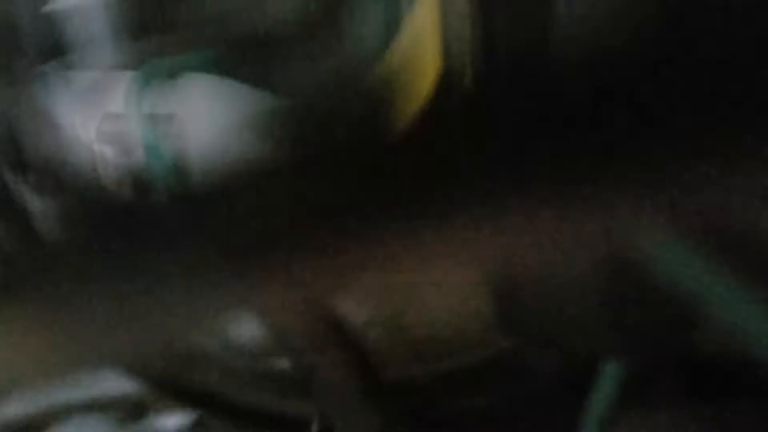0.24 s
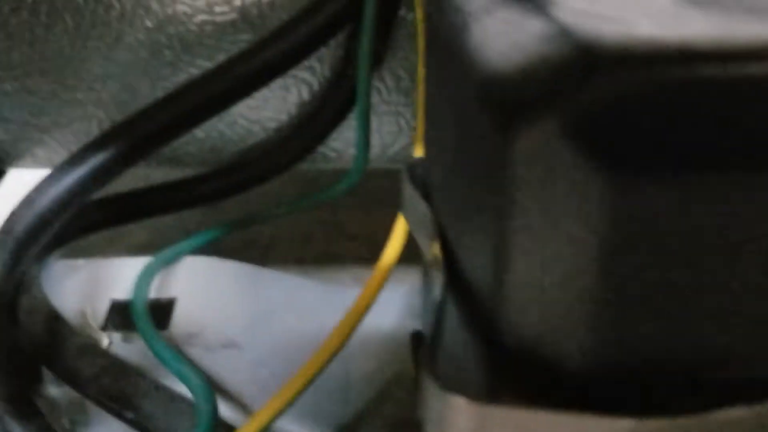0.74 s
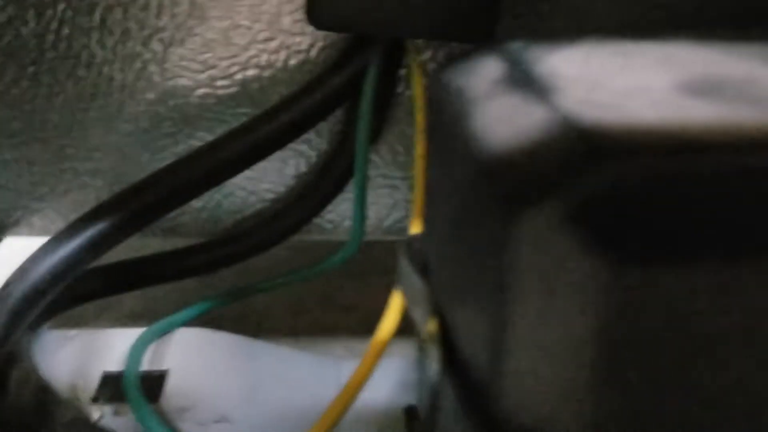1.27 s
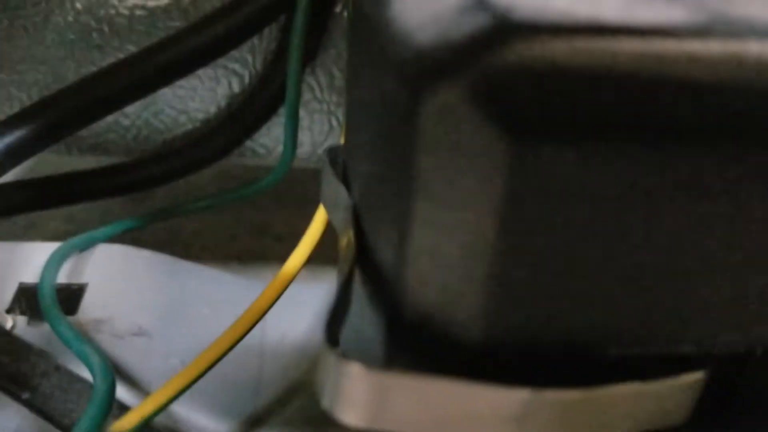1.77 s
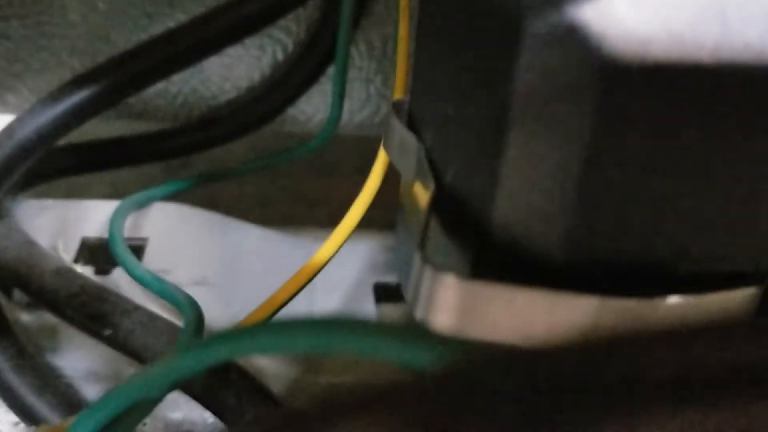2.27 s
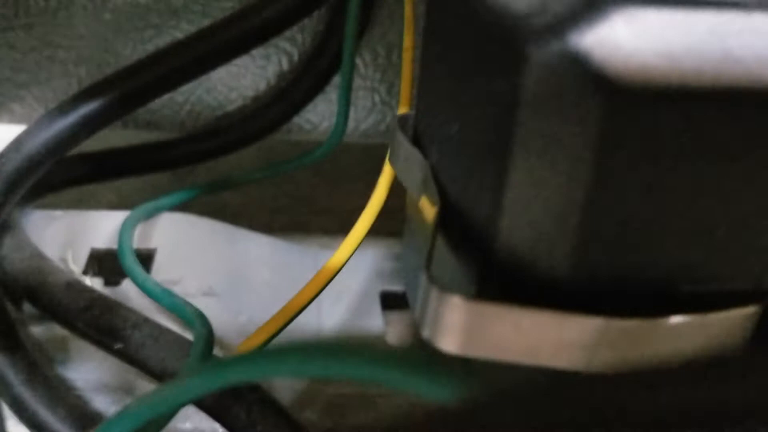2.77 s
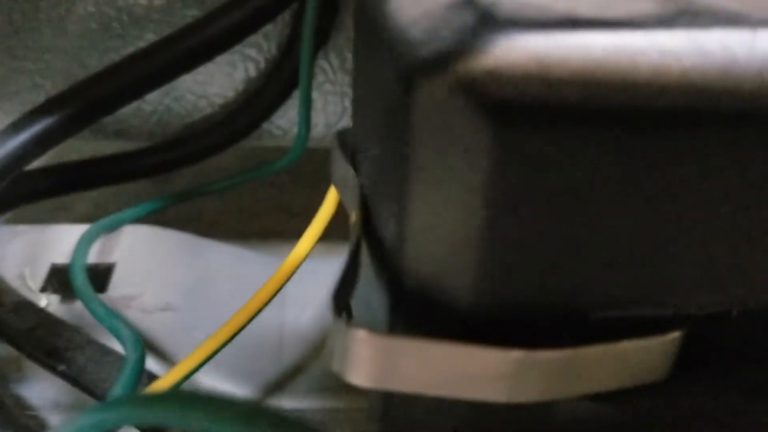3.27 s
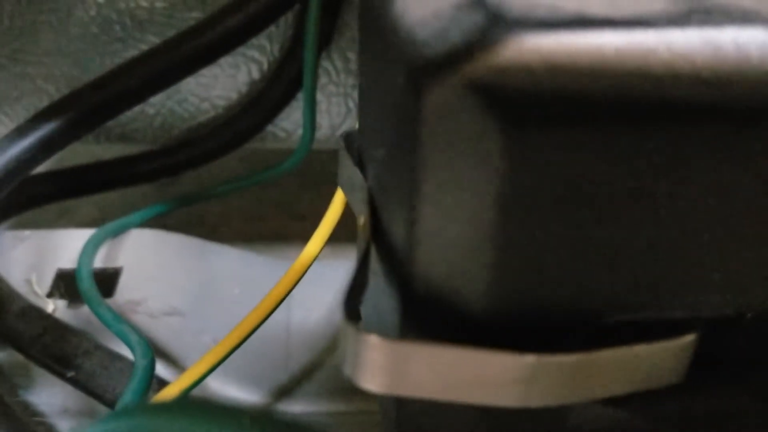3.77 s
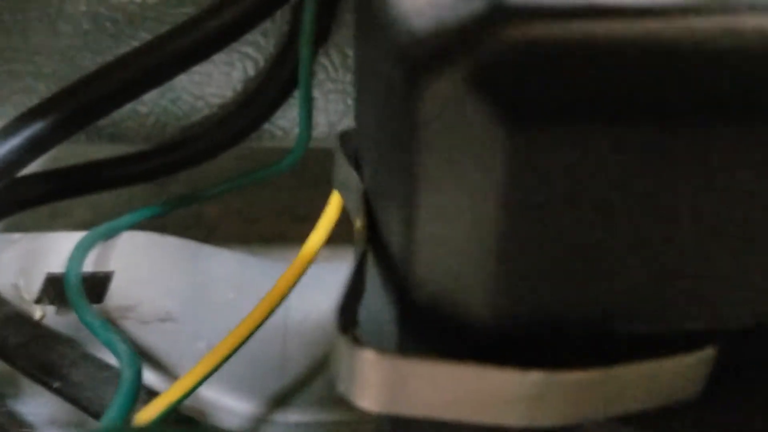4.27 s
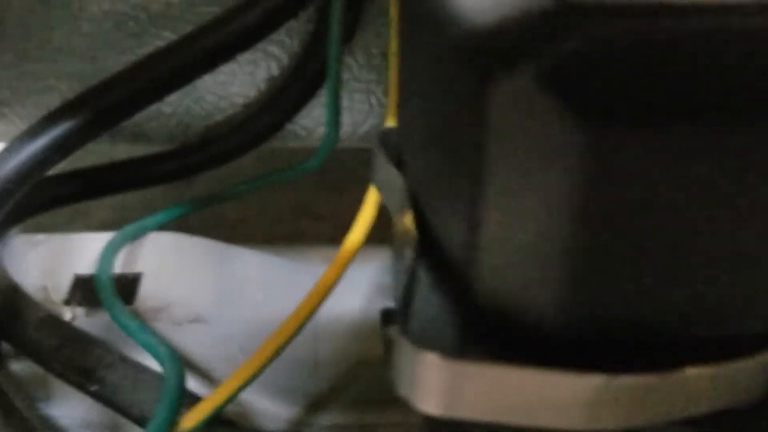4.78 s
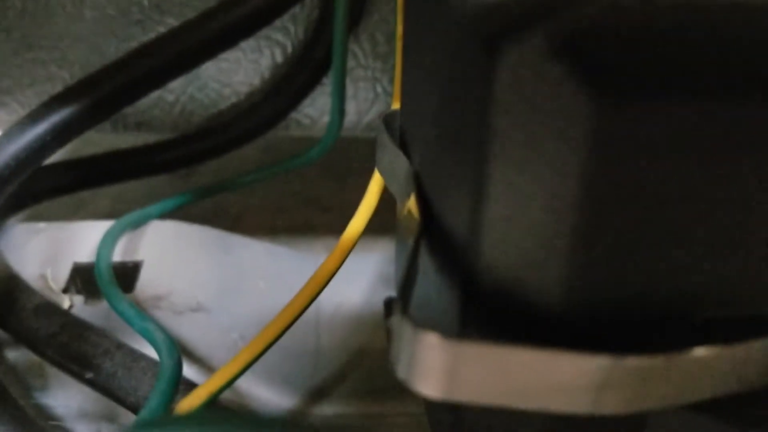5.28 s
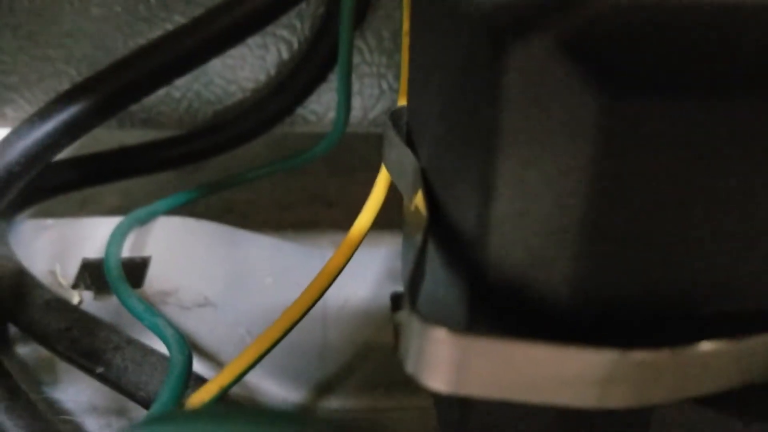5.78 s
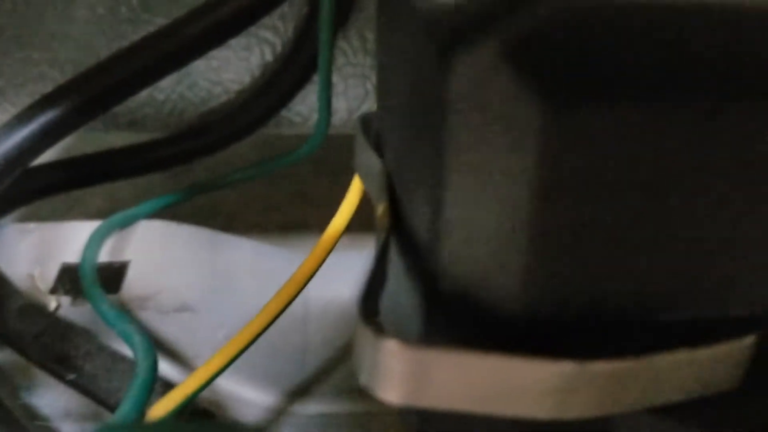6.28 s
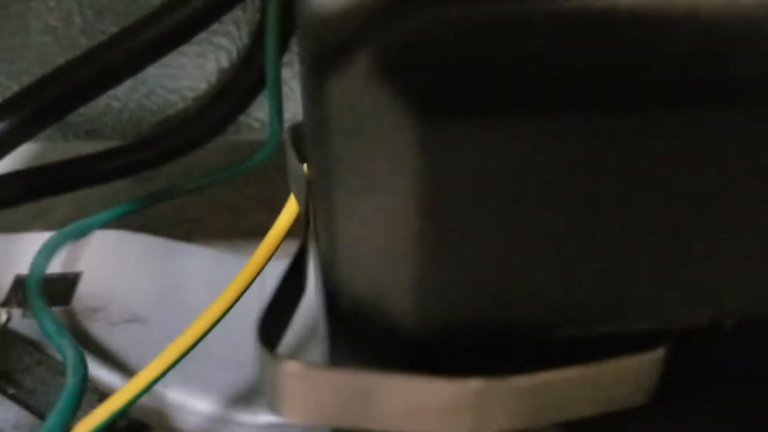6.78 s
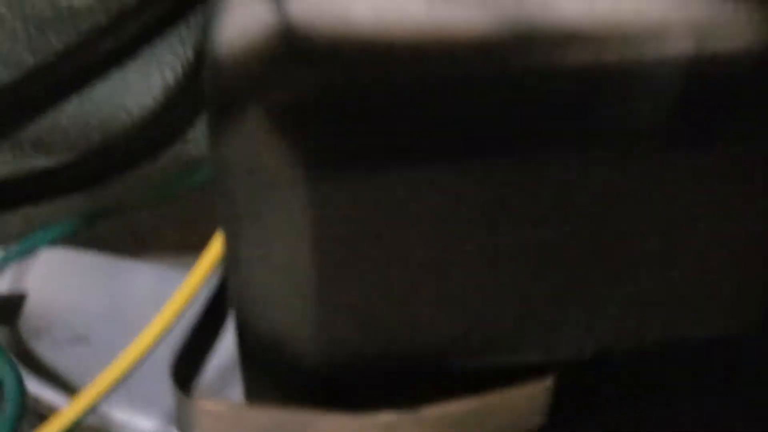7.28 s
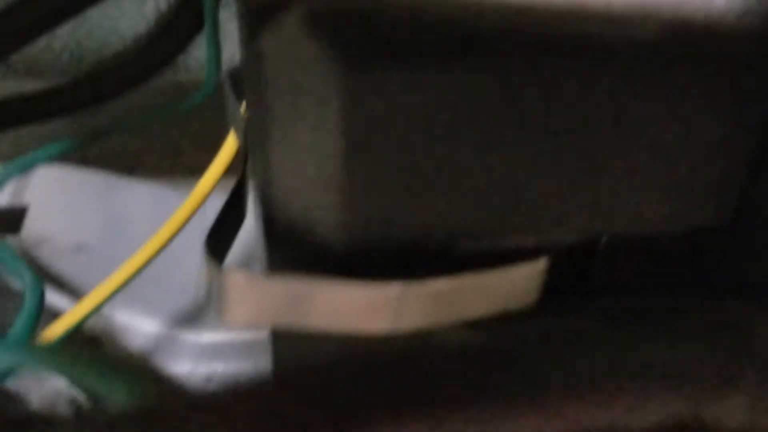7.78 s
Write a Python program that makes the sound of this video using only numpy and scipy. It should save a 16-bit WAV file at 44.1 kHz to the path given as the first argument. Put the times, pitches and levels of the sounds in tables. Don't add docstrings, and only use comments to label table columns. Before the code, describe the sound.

Indoors, microphones lie beside a fridge compressor. The case bumps a pipe, then rubs faintly as a car pulls away outside. Low hum begins, and a bright, dry relay snap cracks out, nearer the left. A heavy truck passes with droning, wavering engine tones that slide downward, tyre roar and thin whines. A quieter relay click stops the hum; traffic murmurs on with a faint distant idle.

```python
import sys
import numpy as np
from scipy import signal
from scipy.fft import rfft, irfft
from scipy.io import wavfile

SR = 44100
rng = np.random.default_rng(int(sys.argv[2]) if len(sys.argv) > 2 else 0)


def gain_from_db(level_db):
    decades = np.asarray(level_db, float) / 20
    return 10 ** decades


def unload_wav(signal):
    wavfile.write(
        sys.argv[1],
        SR,
        np.round(np.clip(np.atleast_2d(signal).T, -1, 1) * 32767).astype(np.int16),
    )


N = 354784

# time in seconds, cycle rate in Hz, level in dB.
ENGINE = [(1.4, 42.2, -51.5), (1.75, 43.88, -51), (2.35, 43.51, -50), (2.72, 43.72, -41),
          (2.95, 43.13, -39), (3.5, 41.25, -39.5), (3.87, 38.08, -33), (4.11, 35.69, -39.5),
          (4.3, 34.18, -42.5), (5.4, 34.25, -41), (6.0, 33.08, -43), (6.56, 32.0, -46), (6.8, 31.53, -41),
          (7.0, 30.74, -47), (7.4, 32.15, -53.5)]
# time in seconds, left over right in dB.
ENGINE_LEAN = [(1.4, -1.5), (4.01, 1), (4.64, -7.5), (5.12, -1.5), (6.26, -3), (6.9, -3), (7.4, 4)]
# multiple of the cycle rate, level in dB.
LOW_ORDERS = [(2, 1), (3, -3), (4, 0.8)]
UPPER_ORDERS = [(1, -4.5), (5, -2.5), (6, 3), (7, -2), (8, -0.5), (9, -5), (10, -7), (11, -8.5), (12, -11)]
# centre in Hz, width in Hz, peak in dB.
LOW_RESONANCES = [(91.7, 6.2, 3), (132.1, 9.3, 11.5), (164.6, 10, 3.5)]
UPPER_RESONANCES = [(160, 17, -14.5), (213, 6.8, -13), (263.4, 14, -0.5), (295.2, 18, -2.5),
                    (338, 17, -11.5), (356, 11, -8)]
ECHO_LULLS = {2: [(1.8, 0.22, 7.5), (2.1, 0.071, -5), (2.4, .15, 4), (3.05, 0.13, 1), (3.78, 0.063, 6),
              (4.1, .12, -8)], 3: [(1.75, .15, -15), (2.15, 0.27, -8), (3.45, 0.22, -14.5),
              (3.71, 0.031, 5), (3.95, 0.16, -13)], 4: [(3.62, 0.041, -4.5), (4.11, 0.067, -3),
              (4.36, 0.11, 3), (4.58, .11, -15.5), (6.75, .1, 3), (5.28, 0.083, -4.5), (6.55, 0.046, -10),
              (7.15, 0.043, -8)], 6: [(1.85, .2, 5.5), (2.75, 0.033, 6), (3.35, .15, 3)],
              7: [(2.85, 0.116, 7.5), (3.95, .1, 3)], 9: [(3.05, 0.17, 7), (3.75, .1, 3)],
              11: [(2.7, .15, -7)], 8: [(4.2, 0.13, -6), (4.9, .2, -9), (5.4, 0.23, 2.5), (6.3, .2, -3.5)]}
# time in seconds, tilt in dB per order.
PATH_TILT = [(1.4, 2.5), (2.4, -2.5), (2.8, -2.5), (3.5, 1.05), (4.1, 0.33), (4.6, 2), (5.5, 0),
             (6.5, -0.4), (7.4, 1)]


def truck():
    rate_hz, level_db = in_time(ENGINE)
    low = []
    for order, order_db in LOW_ORDERS:
        hz = order * rate_hz
        db = level_db + order_db + bumps(ECHO_LULLS[order])
        leak = gain_from_db(2 * -11.5)
        low.append(booming(hz, LOW_RESONANCES, leak) * tone(hz, db, rough_db=1.28, lead=0.34))
    second, third, fourth = low
    out = second + third + fourth * pan(in_time(ENGINE_LEAN)[0])
    tilt_db, = in_time(PATH_TILT)
    for order, order_db in UPPER_ORDERS:
        hz = order * rate_hz
        db = level_db + order_db + bumps(ECHO_LULLS.get(order, [])) + max(order - 6, 0) * tilt_db
        sound = tone(hz, db, rough_db=3.0, lead=rng.normal(0, 0.43))
        out += booming(hz, UPPER_RESONANCES, 0.0041) * sound
    return out * while_on(ENGINE, 0.35)


# pitch in Hz, level in dB.
SHELL_TONES = [(3957, -88), (4317, -95), (5760, -94.5)]


def compressor():
    start_s, end_s = 2.6, 5.87
    t = np.arange(N) / SR
    slot_hz = 478.4 - 9 * np.exp(-np.maximum(t - start_s, 0) / 0.33)
    waiting = np.clip((SNAPS[0][0] + .05 - t) / .05, 0, 1)
    slot = tone(slot_hz, -55 - 4.5 * waiting, rough_db=2.6)
    out = slot * pan(35.0)[:, None] * 0.34
    out += tone(np.full(N, 120.0), -39.5 - 4 * waiting, rough_db=2.5)
    out += sum(smeared(hz, db, width_hz=130) for hz, db in SHELL_TONES)
    return out * while_on([[start_s], [end_s]], 0.061)


# start in seconds, peak in dB, left over right in dB, rise in ms,
# bounce in dB, cabinet tail in dB.
SNAPS = [
    (3.1460, -19.5, 7.5, 1.7, -10, -30),
    (5.8318, -32.5, 3, 2.0, -9, -27),
]
# pitch in Hz, level in dB, decay setting in seconds; each mode dies away by 60 dB
# in half this time, held between 0.02 and 0.08 s.
CLOSING_MODES = [(2640, -15, 5.0), (4020, 7, 0.05), (7004, -13, 0.19), (8270, -2, 0.076), (7550, -11, 0.13),
                 (8240, -7.5, 0.15), (14400, -6, 0.13), (14580, -15, 0.23)]
OPENING_MODES = [(5868, -8.5, 0.053), (7639, -24.5, 1.9), (10090, -20, 5.0), (12220, -16, 0.049),
                 (12840, -4, 0.036), (15000, 3, 0.04)]
# frequency in Hz, density in dB per Hz.
CLOSING_SPECTRUM = [(1180, -57), (2000, -26), (3110, -9), (3430, -21), (3950, 1), (4710, -3), (4920, -12),
                    (8000, -8), (8890, -22), (10200, -13), (12700, -14), (13700, -9), (16100, -14.5),
                    (16500, -35.5)]
OPENING_SPECTRUM = [(1410, -44), (2400, -12), (3110, 1), (3510, -17), (4220, -30), (4540, -6),
                    (5000, -16.5), (5880, -10.5), (7920, -21.5), (8380, -8.5), (11600, -16), (15000, -6.5),
                    (16100, -6.5), (16500, -31)]


def relay():
    out, t = np.zeros((2, N)), np.arange(SR // 5) / SR
    bounce_s = .0042
    spectra, mode_sets = (CLOSING_SPECTRUM, OPENING_SPECTRUM), (CLOSING_MODES, OPENING_MODES)
    for row, spectrum, modes in zip(SNAPS, spectra, mode_sets):
        s, db, lean_db, rise_ms, bounce_db, tail_db = row
        white = rng.standard_normal((2, len(t)))
        bin_hz = np.arange(len(t) // 2 + 1) * SR / len(t) + 1
        grit = rms_one(irfft(rfft(white) * gain_from_db(at_hz(spectrum, bin_hz)), len(t)))
        rise = 1000 * t / rise_ms
        blow = (rise * np.exp(1 - rise)) ** 3.0
        chatter = blow + gain_from_db(bounce_db) * np.roll(blow, round(bounce_s * SR))
        body = 0
        for hz, mode_db, t60 in modes:
            ring_s = np.clip(.5 * t60, .02, .08)
            r, w = gain_from_db(-60 / (ring_s * SR)), 2 * np.pi * hz / SR
            mode = signal.lfilter([1, 0, -1], [1, -2 * r * np.cos(w), r * r], white * chatter)
            body = body + gain_from_db(mode_db) * mode
        tail = gain_from_db(tail_db) * np.exp(-t / 0.029) * np.minimum(rise, 1)
        snap = grit * (chatter + tail) / 3 + gain_from_db(-13.5) * body / np.abs(body).max()
        add_at(out, s, gain_from_db(db) * snap * pan(lean_db)[:, None])
    return out


# start in seconds, pitch in Hz, left height, right height.
CONTACTS = [
    (.16306, 1680, 0, -.66),
    (.16327, 1750, -.46, 0),
    (.16425, 1060, -1, .04),
    (.16455, 360, .47, -.12),
    (.1660, 1300, -.03, -.1),
    (.1670, 180, -.33, .33),
    (.1681, 390, -.36, .06),
    (.1712, 72, .27, 0),
    (.1761, 900, -.14, -.05),
    (.1769, 420, -.23, .02),
]
SLOW_RINGS = [
    (.1706, 61, 0, -.19),
    (.1633, 3700, .0008, .003),
]
# start in seconds, peak in dB, centre in Hz, left over right in dB.
CASE_TICKS = [
    (.1630, -22, 2800, -7),
    (.1682, -43, 11000, 6),
    (.2545, -50, 6500, 6),
    (.3381, -49, 8500, 8),
    (.3703, -51, 8000, 2),
    (.7994, -45, 5000, 6),
    (4.9117, -58, 4800, 3),
    (6.3964, -55, 9000, 4),
]
# centre in seconds, length in seconds, level in dB, pitch in Hz.
CABLE_RUBS = [
    (.171, .008, -58, 5500),
    (0.212, .05, -69, 3300),
    (0.344, 0.11, -77, 6070),
    (.52, 0.046, -73, 3500),
    (0.655, 0.16, -80, 4600),
    (0.793, 0.05, -74, 4056),
    (3.409, .07, -53.5, 2480),
    (3.399, 0.05, -63.5, 5500),
    (3.492, 0.075, -59.5, 2400),
    (5.866, .04, -71, 3100),
]


def handling():
    out, t = np.zeros((2, N)), np.arange(SR // 8) / SR

    def strike(s, hz, left, right, rise_ms):
        rise = 1000 * t / rise_ms
        swing = np.sin(2 * np.pi * hz * t) * rise * np.exp(1 - rise)
        add_at(out, s, swing * [[left], [right]])

    for s, hz, left, right in CONTACTS:
        strike(s, hz, left, right, rise_ms=.16 + 1000 * .21 / hz)
    for s, hz, left, right in SLOW_RINGS:
        strike(s, hz, left, right, rise_ms=7.5)
    for s, db, hz, lean_db in CASE_TICKS:
        burst = rng.standard_normal((2, len(t))) * (np.exp(-t / .0004) + .06 * np.exp(-t / .004))
        burst = bandpass(burst, 1, hz / 2, min(hz * 2.5, .45 * SR))
        add_at(out, s, gain_from_db(db) * burst / np.abs(burst).max() * pan(lean_db)[:, None])
    for s, length, db, hz in CABLE_RUBS:
        span = np.arange(round((s - length) * SR), min(N, round((s + length) * SR)))
        grit = bandpass(rng.standard_normal((2, SR // 2)), 2, hz / 1.6, hz * 1.22)
        stroke = np.exp(-(1.8 * (span / SR - s) / length) ** 2)
        out[:, span] += gain_from_db(db) * rms_one(grit[:, :len(span)]) * stroke
    return out


# centre in seconds, length in seconds, level in dB.
THROTTLE = [
    (0.332, 0.042, -43.5),
    (0.537, 0.056, -45.5),
    (0.824, 0.11, -40.5),
    (1.33, 0.25, -42.5),
]
# time in seconds, pitch in Hz, level in dB.
TURBO_WHINE = [(0.7, 10080, -100), (1.5, 10550, -96.5), (2.2, 10730, -93), (2.7, 10870, -86.5),
               (3.1, 10680, -84.5), (4.0, 10570, -94), (5.0, 10570, -91.5), (5.8, 10240, -92.5),
               (6.6, 10110, -94.5), (8.04, 10130, -97.5)]
GEAR_WHINES = [
    [(2.25, 6500, -86), (2.6, 6520, -91), (3.1, 6940, -85), (3.9, 7100, -95)],
    [(4.1, 7100, -89), (4.3, 6900, -85.5), (4.45, 6560, -82.5), (4.6, 6480, -87)],
]
BRAKE_SQUEAK = [(3.83, 8521, -107), (3.848, 8560, -104), (3.866, 8753, -92), (3.944, 9100, -78),
                (4.012, 9002, -78.5), (4.03, 9164, -105)]
FAR_IDLE = [(6.9, 294.4, -60.5), (7.2, 295.7, -56), (8.04, 296.8, -53.5)]


def whines():
    t = np.arange(N) / SR
    start_s, end_s = 0.1956, 1.6
    throttle = sum(gain_from_db(db) * np.exp(-((t - s) / length) ** 2) for s, length, db in THROTTLE)
    car_hz = 131.7 + 10.96 * (t - start_s)
    car = throttle * tone(car_hz, 0, rough_db=-0.5) * while_on([[start_s], [end_s]], .05)
    turbo = smeared(*in_time(TURBO_WHINE), width_hz=130) * while_on(TURBO_WHINE, .02)
    gear = sum(smeared(*in_time(strand), width_hz=220) * while_on(strand, .1) for strand in GEAR_WHINES)
    idle_hz, idle_db = in_time(FAR_IDLE)
    idle = tone(idle_hz, idle_db, rough_db=1.5) + tone(idle_hz * 5 / 3, idle_db - 11, rough_db=1.5)
    idle = idle * while_on(FAR_IDLE, .02)
    squeak = tone(*in_time(BRAKE_SQUEAK), rough_db=.7, lead=1.5) * while_on(BRAKE_SQUEAK, .008)
    return car + turbo + gear + idle + squeak


# frequency in Hz, density in dB per Hz.
ROAD_SPECTRUM = [(18, -50), (28, -33.5), (42, -12), (65, -2.5), (110, -6.5), (250, -8), (330, -17),
                 (450, -27.5), (800, -29), (1450, -34), (1800, -43.5), (2300, -50.5), (2950, -62.5),
                 (7500, -73)]
# centre in seconds, length in seconds, change in dB.
RUMBLE_GUSTS = [
    (1.15, 0.47, 5),
    (1.9, 0.14, -1.5),
    (2.7, 0.058, 2),
    (2.94, 0.061, 2),
    (3.25, .12, -3.5),
    (3.56, 0.17, 1.5),
    (4.9, .35, -2),
    (6.15, .3, 3.5),
    (7.4, 0.16, 2.5),
]


def road():
    near_db, busy, settle = street()
    rumble_db = -43.5 + 0.43 * near_db + 5 * busy + bumps(RUMBLE_GUSTS)
    tyre_db = -59.5 + 0.34 * near_db + 4.5 * busy + 5.5 * settle
    rattle_db = -86.5 + near_db + 3.5 * busy + 19.5 * settle

    def swell(hz):
        above_rumble = at_hz([(330, 0.28), (520, 0.95)], hz)
        above_tyre = at_hz([(2000, 0.024), (3200, 0.91)], hz)
        rumble = (rumble_db + 18.5) * (1 - above_rumble)
        tyre = (tyre_db + 42.5) * (above_rumble - above_tyre)
        return rumble + tyre + (rattle_db + 68.5) * above_tyre

    return banded_noise(ROAD_SPECTRUM, 26.1, 7685, count=25, patchy_db=1.06, shape=swell)


# frequency in Hz, density in dB per Hz.
HISS_SPECTRUM = [(2650, -39), (4500, -10), (6500, -15), (8240, -23), (9540, -16), (9790, -13.5),
                 (10600, -9.5), (12100, -2), (15100, -2), (15800, -0.5)]


def hiss():
    near_db, busy, settle = street()
    db = -82 + .2 * near_db + 4 * busy + 6.5 * np.sqrt(settle)
    since = np.arange(N) / SR - np.array(SNAPS)[:, :1]
    db = db + 2.5 * np.sum((since > 0) * np.exp(-np.abs(since) / .35), axis=0)
    return gain_from_db(db) * rms_one(banded_noise(HISS_SPECTRUM, 4500, 16500, count=7, patchy_db=.15))


# time in seconds, level over the far traffic in dB.
NEARNESS = [(1.9, 1.5), (2.4, 1), (2.84, 10.5), (3.3, 17.5), (3.6, 16), (4.1, 9.5), (4.6, 6.5), (5.3, 4.5),
            (6.0, 1.5), (7.0, 1)]


def street():
    t = np.arange(N) / SR
    busy = .5 + .5 * np.tanh((t - 2.33) / 0.29)
    settle = np.exp(-t / 0.19)
    return in_time(NEARNESS)[0], busy, settle


# frequency in Hz, left-right likeness from -1 to 1.
LIKENESS = [(60, 1), (99, 0.9), (160, 0.91), (270, 1), (450, 0.067), (740, 0.017), (1220, -0.25),
            (2010, -0.12), (3330, -0.071), (5500, -0.056), (9080, -0.01), (15000, 0.046)]
# frequency in Hz, left over right in dB.
NOISE_LEAN = [(60, 0), (110, 0), (200, -3), (380, 7), (700, -3.5), (1290, -2), (2380, -3), (4400, 2.5),
              (8120, 1.5), (15000, 4)]


def banded_noise(spectrum, low_hz, high_hz, count, patchy_db, shape=lambda hz: 0):
    out, edges = 0, np.geomspace(low_hz, high_hz, count + 1)
    white = rng.standard_normal((2, 2, N))
    together = drift(4.8)
    for k, (low, high) in enumerate(zip(edges, edges[1:])):
        mid, side = bandpass(white[k % 2], 3, low, high)
        hz = np.sqrt(low * high)
        alike = np.clip(at_hz(LIKENESS, hz), -1, 1)
        gain = gain_from_db(at_hz(spectrum, hz) + shape(hz) + patchy_db * (.5 * together + drift(17)))
        pair = np.sqrt(1 + alike) * mid + np.sqrt(1 - alike) * side * [[1], [-1]]
        out = out + gain * pair * pan(at_hz(NOISE_LEAN, hz))[:, None]
    return out


def tone(hz, db, rough_db, lead=0):
    phase = 2 * np.pi * (np.cumsum(hz) / SR + rng.random())
    ears = np.array([[lead / 2], [-lead / 2]])
    return np.sqrt(2) * gain_from_db(db + rough_db * drift(16)) * np.sin(phase + ears)


def smeared(hz, db, width_hz):
    lowpass = signal.butter(2, width_hz / 2, fs=SR, output="sos")
    blur = signal.sosfilt(lowpass, rng.standard_normal((2, 2, N)))
    phase = 2 * np.pi * np.cumsum(hz * np.ones(N)) / SR
    return gain_from_db(db) * rms_one(blur[0] * np.sin(phase) + blur[1] * np.cos(phase))


def booming(hz, resonances, leak):
    power = leak
    for centre, width, top_db in resonances:
        power = power + gain_from_db(2 * top_db) / (1 + (2 * (hz - centre) / width) ** 2)
    return np.sqrt(power)


def drift(rate):
    r = np.exp(-80 * np.pi * rate / SR)
    slow = signal.lfilter([1], [1, -2 * r, r * r], rng.standard_normal(N // 40 + 2002))[2000:]
    return np.interp(np.arange(N) / 40, np.arange(len(slow)), rms_one(slow))


def bumps(rows):
    t = np.arange(N) / SR
    return sum(db * np.exp(-((t - s) / length) ** 2) for s, length, db in rows)


def bandpass(x, order, low_hz, high_hz):
    return signal.sosfilt(signal.butter(order, [low_hz, high_hz], "band", fs=SR, output="sos"), x)


def rms_one(x):
    return x / np.sqrt(np.mean(x ** 2) + 1e-20)


def pan(db):
    return gain_from_db(np.array([db / 2, -db / 2]))


def add_at(out, s, sound):
    out[:, round(s * SR):][:, :sound.shape[1]] += sound


def in_time(rows):
    s, *columns = np.transpose(rows)
    return [np.interp(np.arange(N) / SR, s, c) for c in columns]


def while_on(rows, fade_s):
    t = np.arange(N) / SR
    return np.clip(np.minimum(t - rows[0][0], rows[-1][0] - t) / fade_s, 0, 1)


def at_hz(points, hz):
    return np.interp(np.log(hz), np.log(np.array(points)[:, 0]), np.array(points)[:, 1])


def scene():
    notch_hz, notch_width_hz, leak = 9000, 3000, .2
    notch = signal.iirnotch(notch_hz, notch_hz / notch_width_hz, fs=SR)
    clicks = relay() + handling() + 1e-18
    clicks = leak * clicks + (1 - leak) * signal.lfilter(*notch, clicks)
    return truck() + compressor() + clicks + whines() + road() + hiss()


def roll_off(x):
    return signal.sosfilt(signal.butter(12, 17140, fs=SR, output="sos"), x)


def record(dry):
    lowpass = signal.ellip(12, .5, 70, 15900, fs=SR, output="sos")
    mix = signal.sosfilt(lowpass, np.clip(dry, -1, 1))
    return roll_off(mix)


dry = scene()
out = record(dry)
unload_wav(out)
```